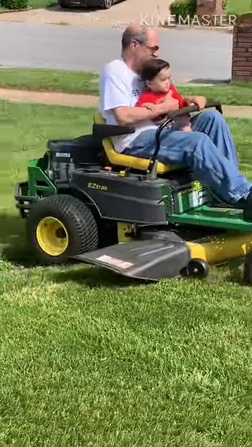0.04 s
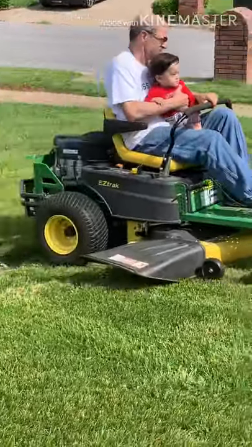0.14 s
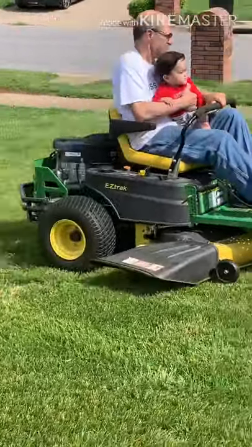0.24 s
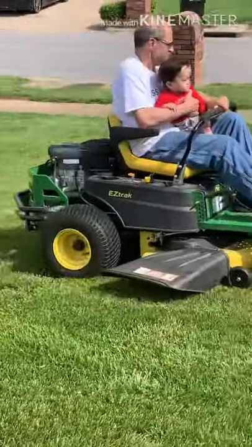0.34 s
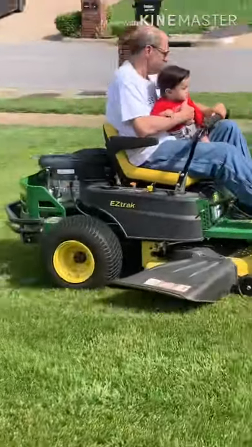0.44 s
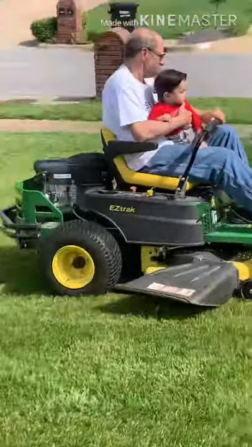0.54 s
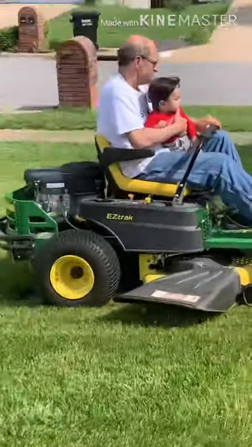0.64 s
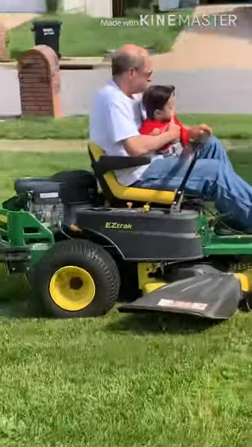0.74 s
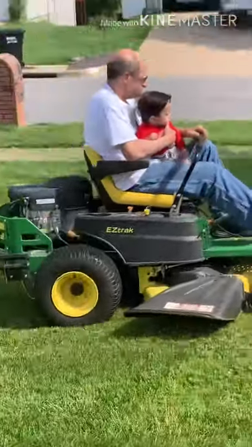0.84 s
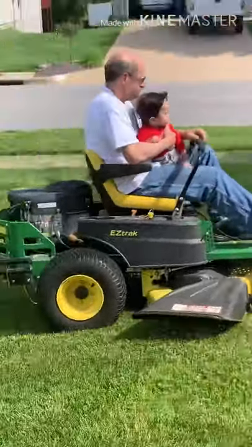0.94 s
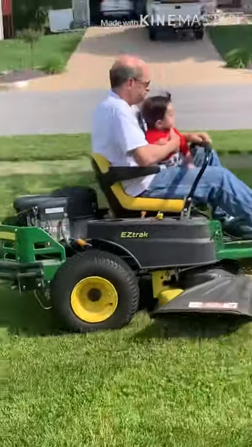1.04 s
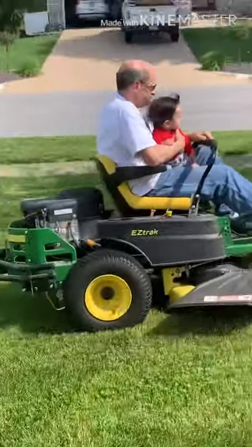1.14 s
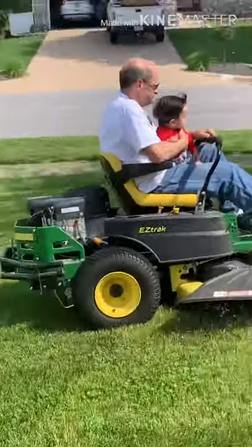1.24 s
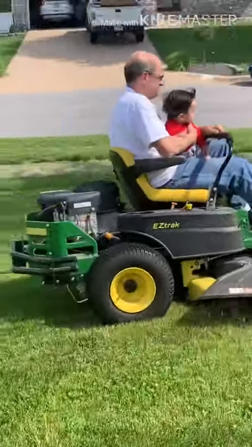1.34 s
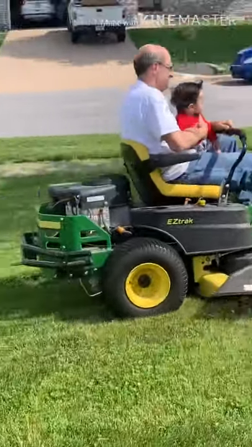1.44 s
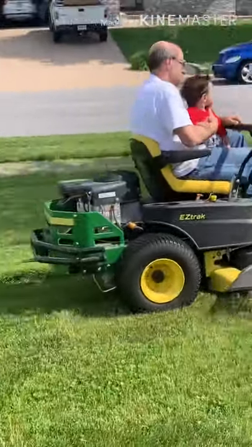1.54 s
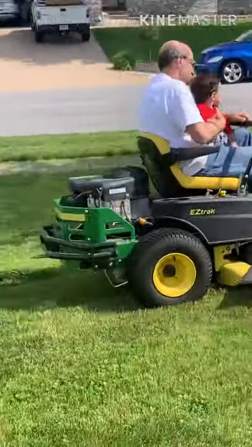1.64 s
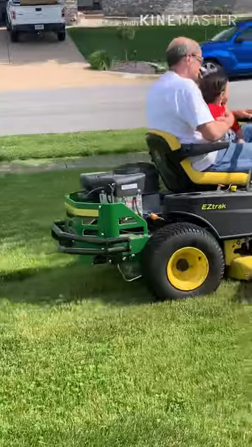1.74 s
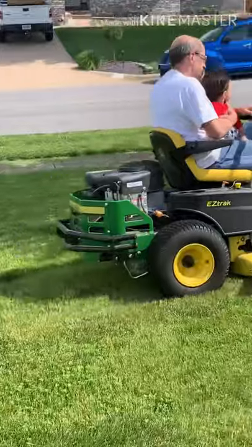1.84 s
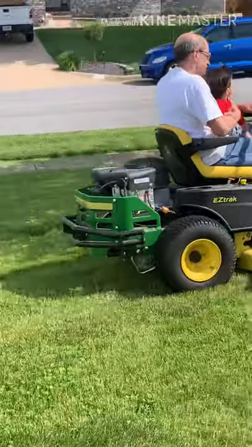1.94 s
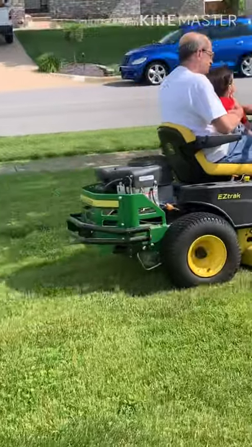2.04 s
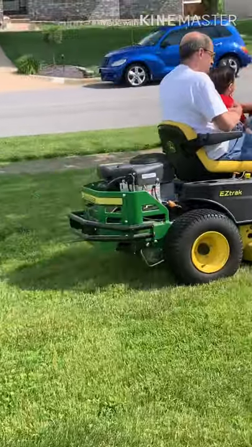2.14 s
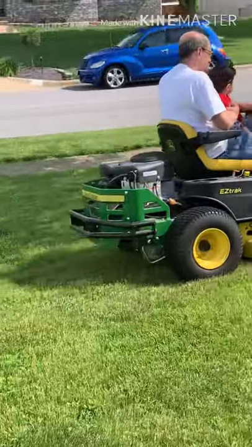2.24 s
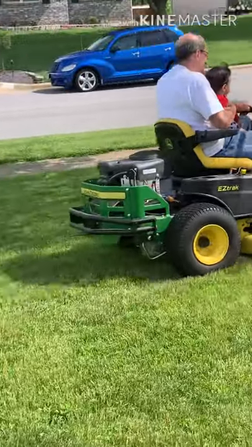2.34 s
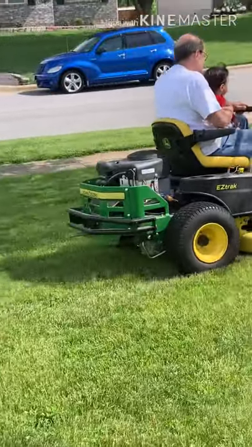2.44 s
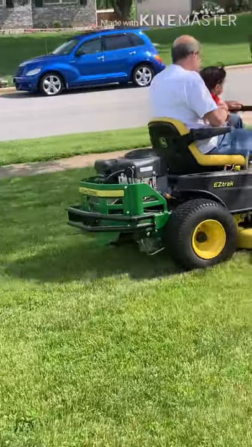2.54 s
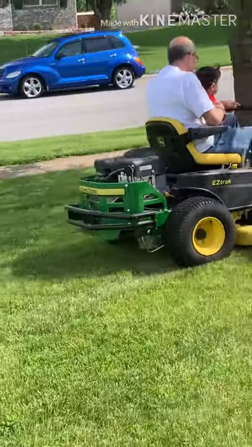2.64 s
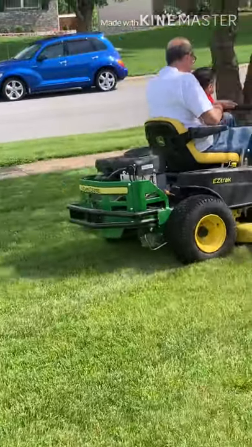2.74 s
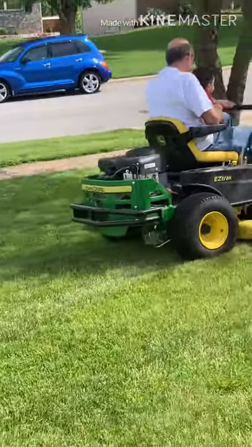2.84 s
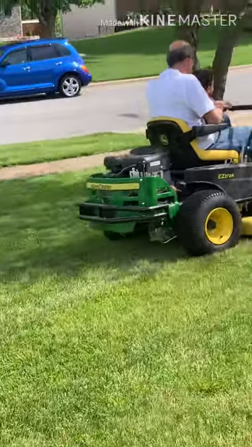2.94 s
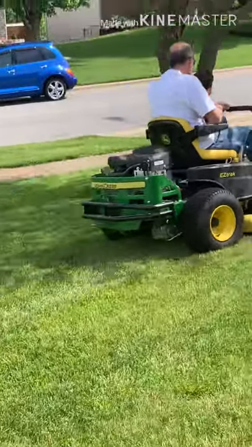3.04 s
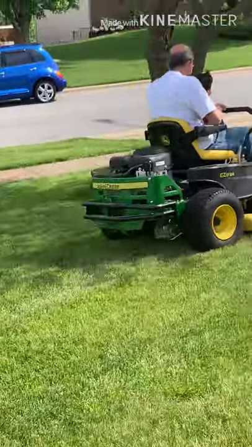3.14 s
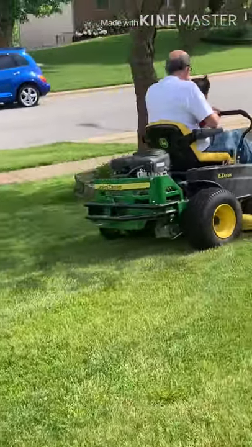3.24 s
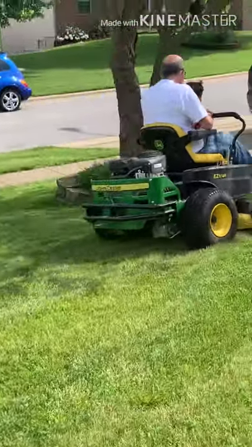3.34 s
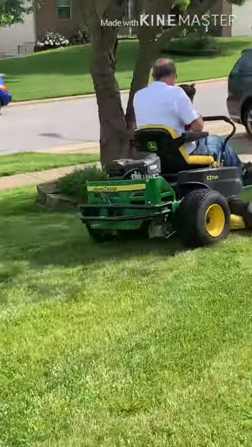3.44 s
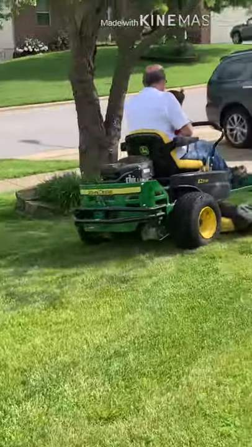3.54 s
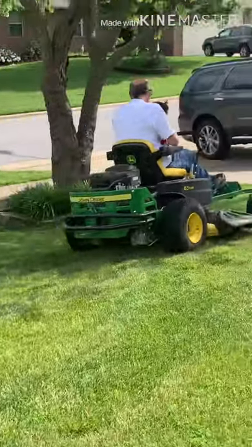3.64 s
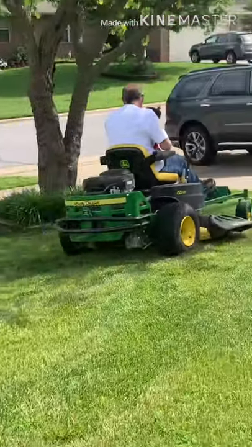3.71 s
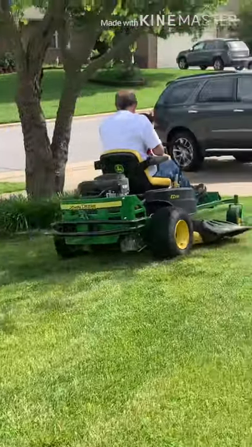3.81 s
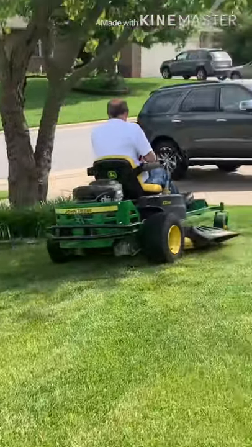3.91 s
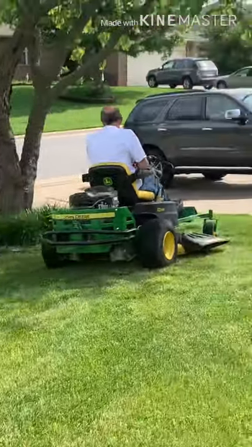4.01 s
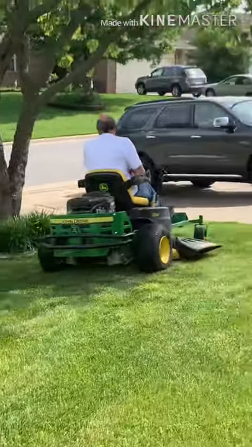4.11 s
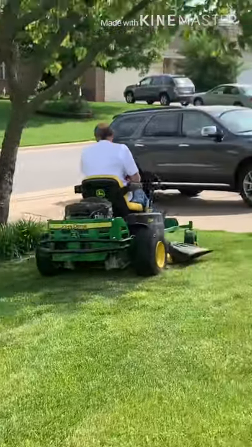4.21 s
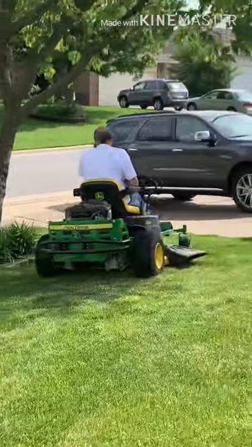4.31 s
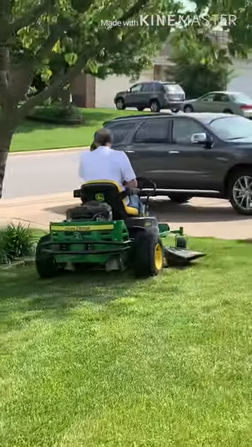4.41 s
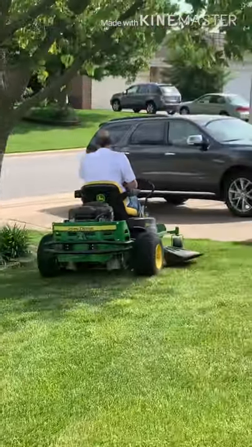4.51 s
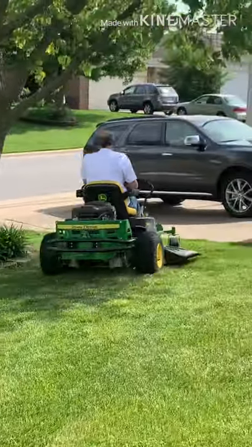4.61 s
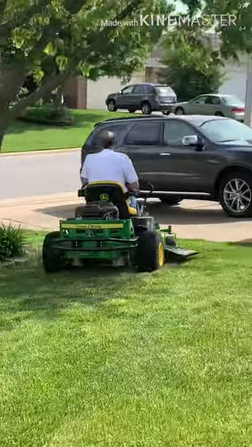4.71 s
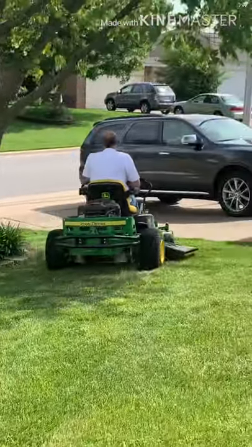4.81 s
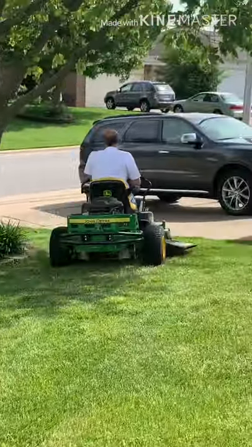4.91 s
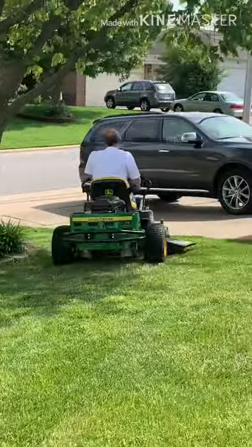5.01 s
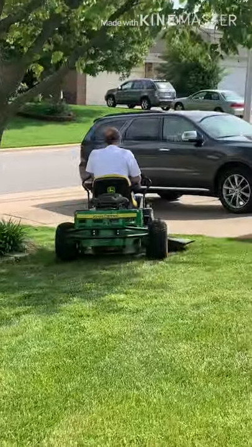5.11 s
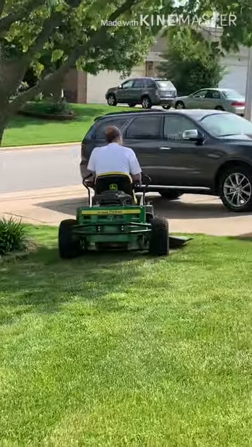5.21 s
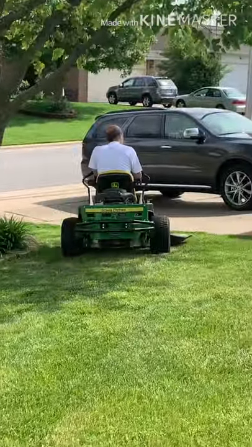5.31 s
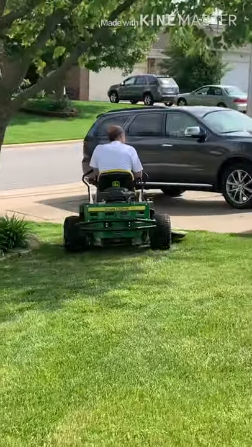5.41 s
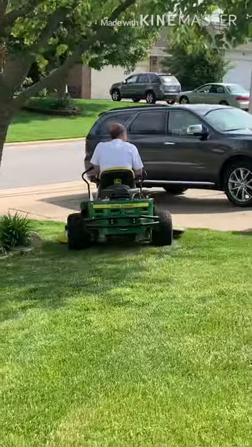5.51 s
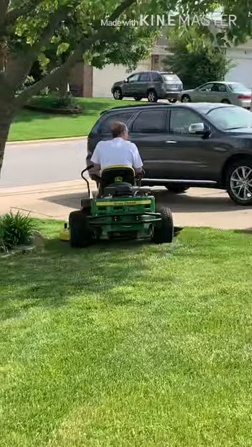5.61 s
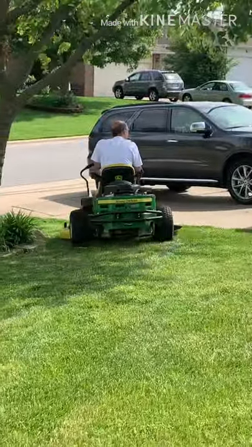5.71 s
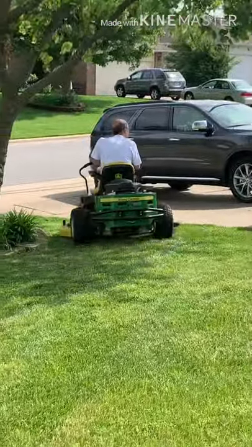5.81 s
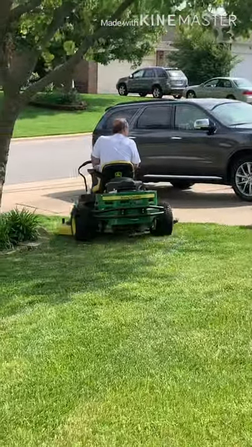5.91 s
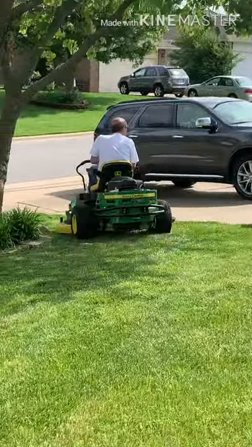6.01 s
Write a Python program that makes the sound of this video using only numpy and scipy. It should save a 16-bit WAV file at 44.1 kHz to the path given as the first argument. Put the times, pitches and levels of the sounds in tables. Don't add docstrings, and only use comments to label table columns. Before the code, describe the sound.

Steady twin-cylinder mower engine and chopping blade drone under rushing air and hiss, slowly receding, with faint belt squeals and soft low footstep thuds.

```python
import sys
import numpy as np
from scipy import signal
from scipy.fft import rfft, irfft
from scipy.io import wavfile
from scipy.ndimage import uniform_filter1d

SR = 44100
rng = np.random.default_rng(int(sys.argv[2]) if len(sys.argv) > 2 else 0)


def pcm_store(signal):
    levels = np.round(np.clip(np.atleast_2d(signal), -1, 1) * 32767)
    wavfile.write(sys.argv[1], SR, levels.astype(np.int16).T)


def voltage_ratio(decibels):
    exponent = np.asarray(decibels, float) / 20
    return 10 ** exponent


N = 267246
T = np.arange(N) / SR
F = np.fft.rfftfreq(N, 1 / SR)


def curves(table):
    time_s, *columns = np.transpose(table)
    return [np.interp(T, time_s, column) for column in columns]


def on_log(points):
    hz, value = np.transpose(points)
    return np.interp(np.log(F + 1), np.log(hz + 1), value)


def swells(table):
    return sum(height * np.exp(-((T - centre_s) / half_s) ** 2) for centre_s, half_s, height in table)


def walk(rate_hz):
    hold = int(SR / rate_hz)
    levels = np.repeat(rng.standard_normal(N // hold + 1), hold)
    return 1.33 * uniform_filter1d(uniform_filter1d(levels, hold), hold)[:N]


def tone(turns, rms_db):
    return np.sqrt(2) * voltage_ratio(rms_db) * np.cos(2 * np.pi * turns)


def rush(colour, ref_lo_hz, ref_hi_hz, flicker_db, rate_hz):
    lo_hz, hi_hz = colour[0][0], colour[-1][0]
    gain = voltage_ratio(on_log(colour))
    gain[(F < lo_hz) | (F > hi_hz)] = 0
    gain /= np.sqrt(2 * np.sum(gain[(F > ref_lo_hz) & (F < ref_hi_hz)] ** 2) / N)
    noise = rfft(rng.standard_normal(N)) * gain
    out = 0
    for step in np.arange(np.log2(lo_hz) * 2, np.log2(hi_hz) * 2 + 1):
        band = np.clip(1 - abs(2 * np.log2(F + 1) - step), 0, 1)
        out = out + irfft(noise * band, N) * voltage_ratio(flicker_db * walk(rate_hz))
    return out


# (time [s], engine cycle rate [Hz], near blade pass rate [Hz])
SHAFT_SPEED = [(0.0, 25.993, 120.74), (0.356, 26.024, 121.36), (0.713, 26.057, 121.62),
               (1.069, 25.917, 120.74), (1.426, 25.776, 119.82), (1.782, 26.151, 121.52),
               (2.139, 26.377, 122.43), (2.495, 26.329, 122.14), (2.852, 26.346, 122.5),
               (3.208, 26.302, 122.41), (3.565, 26.157, 121.94), (3.921, 26.155, 121.46),
               (4.278, 26.421, 122.76), (4.634, 26.681, 124.54), (4.991, 26.732, 124.61),
               (5.347, 26.657, 124.21), (5.704, 26.62, 124.33), (6.06, 26.616, 124.51)]
# (centre [s], half length [s], mean blade rate change [Hz])
GRASS_DRAG = [
    (1.15, .12, .4),
    (1.43, .15, -1.15),
    (2.35, .12, -.5),
    (3.75, .12, .45),
    (4.0, .09, -.65),
    (5.0, .2, .9),
]


def rotation():
    cycle_hz, near_hz = curves(SHAFT_SPEED)
    cycle = .100 + np.cumsum(cycle_hz) / SR
    near = .273 + np.cumsum(near_hz) / SR
    pulley_ratio = 4.661
    mean = pulley_ratio * cycle + np.cumsum(swells(GRASS_DRAG)) / SR
    return cycle, near, mean


# (time [s], deck roar [dB], left minus right [dB])
DISTANCE_CURVE = [(0, -27.5, 4.5), (.4, -28.5, 3.5), (.9, -29.5, 3), (1.3, -30, 4), (1.65, -29.5, 4),
                  (2, -31, 3.5), (2.25, -30.5, 5), (2.75, -31.5, 4), (3.1, -30.5, 3), (3.45, -31.5, 3.5),
                  (3.85, -32, 3), (4.05, -33.5, 2), (4.45, -33, 3.3), (4.85, -33, 2.5), (5.4, -33, 3.5),
                  (5.7, -33.5, 3.5), (6.06, -33, 3)]


def distance():
    roar_db, pan_db = curves(DISTANCE_CURVE)
    return roar_db, roar_db - roar_db.mean(), 0.79 * (pan_db - pan_db.mean())


EXHAUST_PHASE = {2: -.48, 5: 0., 6: .45, 8: .02}
# (order, start level [dB], fade [dB/s], share of tail pipe swing)
EXHAUST_STRONG = [(2, -29.5, -1.26, .15), (5, -28.5, 0.14, 1.05), (6, -35, -0.05, 0.12),
                  (8, -36, -0.32, 1.15), (3, -51, 2, 1.1)]
# (order, level over order 6 [dB])
EXHAUST_WEAK = [(4, -12), (7, -3), (9, -7), (10, -11), (11, -12), (12, -7), (13, -15)]
# (time [s], level [dB])
TAIL_PIPE = [(0, 4), (.7, 2), (1, -2.5), (1.7, 1), (2.36, 0), (3.03, 3), (3.4, -4.5), (3.7, 1), (4.04, -5),
             (4.38, 1), (4.7, -0.5), (5.05, -1), (5.4, 1), (6.06, 2)]


def engine(cycle):
    facing_db = curves(TAIL_PIPE)[0]
    levels_db = {round(k): db + fade * T + share * facing_db for k, db, fade, share in EXHAUST_STRONG}
    out = tone(3 * cycle, levels_db[3])
    for k, turns in EXHAUST_PHASE.items():
        out = out + tone(k * cycle + turns, levels_db[k] + walk(13))
    for k, db in EXHAUST_WEAK:
        waver = 0.27 * walk(2.005) + 0.012 * k * walk(15)
        out = out + tone(k * cycle + waver, levels_db[6] + db + 5.3 * walk(3.97))
    return out


# (time [s], second spindle lag [blade passes], third lag [blade passes],
# grass load [dB], sharpness [dB per tone])
BELT_SLIP = [(0.0, 0.33, 0.22, 2.5, -0.18), (0.46, 0.32, 0.365, 4.5, -0.56),
             (0.66, 0.262, 0.29, -1.0, 0.13), (1.18, 0.091, 0.51, 0.1, 1.49), (1.44, 0.086, 0.49, -2, 0.9),
             (1.65, 0.14, 0.57, -0.4, 0.94), (2.27, 0.3, 0.61, -7.5, 2.04), (2.48, 0.31, 0.78, -6.5, 3),
             (2.88, 0.28, 0.888, 1.3, -1.2), (3.27, 0.16, 0.9, 3.4, -0.5), (3.5, 0.24, 0.91, 3.0, -0.1),
             (3.9, 0.16, 0.97, -2.0, 0.8), (4.15, 0.19, 0.92, 0.3, -3), (4.61, 0.19, 0.94, 4.5, -1.8),
             (4.92, 0.28, 0.84, 2.5, -2.5), (5.24, 0.31, 1.03, -0.5, 0.57), (5.58, 0.41, 1.08, -0.5, -0.5),
             (6.06, 0.354, 1.039, -4.5, 0.94)]
# (near spindle start level [dB], fade [dB/s], second spindle share, third share)
SPINDLE_TONES = [(-21, -1.01, 0.43, -0.026), (-19, -1.64, 0.78, -0.045), (-21, -2.02, 0.43, 0.5),
                 (-33, -0.03, 0.3, 0.64), (-35.5, -1.82, 1.69, 0.14), (-38, -0.2, 0.045, 0.82),
                 (-31, -7, 0.054, 0.15), (-49.6, -4, 0.54, 1.4)]


def spindles():
    second, third, load_db, sharp_db = curves(BELT_SLIP)
    floor = voltage_ratio(-46.5)
    levels_db = []
    for k, (db, fade, share2, share3) in enumerate(SPINDLE_TONES, 1):
        second_wave = share2 * np.exp(2j * np.pi * k * second)
        third_wave = share3 * np.exp(2j * np.pi * k * third)
        tone_db = db + fade * T + load_db + 0.1 + (sharp_db + 0.45) * (k - 1)
        size = abs(1 + second_wave + third_wave) * voltage_ratio(tone_db)
        levels_db.append(20 * np.log10(np.hypot(size, floor)))
    return levels_db


def blades(near, mean, roar_db):
    levels_db = spindles()
    out = tone(near, levels_db[0] + .5 * walk(17))
    shake = .016 * walk(12)
    for k in range(2, 17):
        if k < 9:
            db = levels_db[k - 1]
        else:
            db = (roar_db + levels_db[6]) / 2 - 10.0 - 0.76 * (k - 8)
            db = db + np.clip(9.9 * walk(3.86), -15, 4)
        waver = .15 * walk(2) + .014 * k * walk(18)
        dip = near - .5 if k < 4 else mean
        out = out - tone(k * (dip + shake) + waver, db + 1.5 * walk(15))
    return out


# (frequency [Hz], density [dB/Hz])
ROAR_COLOUR = [(30, -6), (70, 3), (170, 8), (300, 10), (560, 7.5), (1000, 2.5), (1500, 1), (1900, -2),
               (2300, -9), (4000, -18.5)]


def deck_roar(chop, roar_db):
    noise = rush(ROAR_COLOUR, 1036, 2300, flicker_db=1.35, rate_hz=7)
    return noise * (1 + 0.18 * chop) * voltage_ratio(roar_db - 1.7)


def rattle(level_db, count=1500):
    out, t = np.zeros(N + 2048), np.arange(2048) / SR
    for when, pitch, size, ring in rng.random((count, 4)):
        i, hz = int(when * N), 900 * 11 ** pitch
        ring_s = .004 + .006 * ring
        db = level_db[i] - 4.5 * np.log2(hz / 3000) + np.clip(12.9 * size ** 2, 0, 12)
        envelope = (t / ring_s) * np.exp(1 - t / ring_s)
        out[i:i + 2048] += voltage_ratio(db) * envelope * np.sin(2 * np.pi * hz * t)
    return out[:N]


# (frequency [Hz], density [dB/Hz])
RASP_COLOUR = [(1500, -9), (2200, -1), (2700, 3), (3300, -2), (3800, 1.5), (4400, -7), (5400, -6),
               (7000, -8.5)]
# (centre [s], half length [s], rise [dB])
CHUTE_THROWS = [
    (0, .35, 5),
    (1.4, .7, 1.5),
    (5.6, 0.78, 1.5),
]


def clippings(chop, nearness_db, gust_db):
    rasp_db = -38.5 + 0.59 * nearness_db + swells(CHUTE_THROWS)
    noise = rush(RASP_COLOUR, 2130, 4430, flicker_db=2.5, rate_hz=6.14) * (1 + 0.084 * chop)
    return noise * voltage_ratio(rasp_db - 3.5 + gust_db) + rattle(rasp_db - 9.5)


# (frequency [Hz], density [dB/Hz])
HISS_COLOUR = [(3000, -18.5), (4500, 4.5), (5500, 0), (7000, 1), (9000, -1), (12000, -4), (14500, -5.5),
               (15800, -11)]


def fan_hiss(cycle, chop, nearness_db, gust_db):
    fade_db_s = -0.53
    hiss_db = -39.5 + 0.59 * nearness_db + fade_db_s * (T - T.mean())
    turn = 2 * np.pi * cycle
    firing = .06 * np.cos(turn) + .04 * np.cos(2 * turn) + .08 * np.cos(3 * turn)
    noise = rush(HISS_COLOUR, 6000, 8500, flicker_db=1.3, rate_hz=7)
    return noise * (1 + firing + .07 * chop) * voltage_ratio(hiss_db - 2.0 + gust_db)


# (centre [s], half length [s], rise over rest [dB])
BELT_SQUEALS = [
    (.4, .8, 8),
    (1.5, 0.42, 15),
    (2.2, .5, 8),
    (3.55, .45, 16),
]


def belt():
    rest_db = -66
    squeal_hz = 8890 + 45 * walk(40)
    return tone(np.cumsum(squeal_hz) / SR, rest_db + swells(BELT_SQUEALS) + 3.3 * walk(24.7))


# (centre [s], half length [s], scatter rise [dB])
SCATTER_RISES = [
    (.1, 0.77, 2.5),
    (2.85, 0.74, 5),
    (5.7, 1, 4),
]


def scatter(mower):
    detours = np.array([np.roll(mower, lag_samples) for lag_samples in (1630, 2270)])
    return detours * voltage_ratio(-4 + swells(SCATTER_RISES))


# (frequency [Hz], right trails left [rad])
PORT_LAG = [(0, 0), (200, -.08), (700, .76), (1400, -.1), (1800, .39), (2450, 2.57), (3000, 2.06),
            (3800, 1.59), (4900, 3.1), (6950, 6.28), (9650, 9.42), (12450, 12.57), (15000, 15.71),
            (17000, 16.5)]
# (frequency [Hz], left minus right [dB])
PORT_LEVEL = [(60, 0.5), (200, -4), (400, -0.5), (750, 4.5), (1100, -0.5), (2300, 0), (2700, 0.5),
              (3500, 4), (4400, 0.5), (15000, 0)]
# (frequency [Hz], level re direct [dB])
SCATTERED_SHARE = [(60, -28), (300, -15), (700, -7), (1400, -15), (2300, -3), (3300, -.5), (4900, -9),
                   (5800, -2.5), (8500, -3), (13300, -1), (14300, -9)]


def ports(direct, scattered):
    hz, radians = np.transpose(PORT_LAG)
    half = np.exp(.5j * np.interp(F, hz, radians)) * voltage_ratio(on_log(PORT_LEVEL) / 2)
    spread = rfft(scattered) * voltage_ratio(on_log(SCATTERED_SHARE))
    return irfft(rfft(direct) * np.array([half, 1 / half]) + spread, N)


# (time [s], peak level [dB], pitch [Hz])
FOOTFALLS = [
    (.53, -32, 75),
    (2.26, -22, 66),
    (2.75, -38, 87.4),
    (3.26, -25, 66),
    (3.74, -34, 85),
    (4.28, -24, 78),
    (4.74, -28, 67.3),
    (5.19, -22, 72),
    (5.70, -40, 66),
]


def steps():
    out = np.zeros(N)
    for time_s, db, hz in FOOTFALLS:
        t = np.clip(T - time_s, 0, None)
        envelope = (t / 0.049) * np.exp(1 - t / 0.046)
        out += voltage_ratio(db - 2.5) * envelope * np.sin(2 * np.pi * hz * t)
    return out


def scene():
    cycle, near, mean = rotation()
    roar_db, nearness_db, pan_db = distance()
    chop = np.cos(2 * np.pi * mean)
    gust_db = .6 * walk(14) + .6 * walk(6)
    mower = engine(cycle) + blades(near, mean, roar_db) + deck_roar(chop, roar_db)
    mower = mower + clippings(chop, nearness_db, gust_db) + fan_hiss(cycle, chop, nearness_db, gust_db)
    mower = mower + belt()
    heard = ports(mower, scatter(mower))
    return heard * voltage_ratio(np.array([pan_db, -pan_db]) / 2) + steps()


def without(x, bands_hz):
    return irfft(rfft(x) * np.prod([(F < lo) | (F > hi) for lo, hi in bands_hz], axis=0), N)


def gated(x, lo_hz, hi_hz, loss):
    return x - (x - without(x, [(lo_hz, hi_hz)])) * np.clip(loss, 0, 1)


def low_pass(x):
    return signal.sosfilt(signal.butter(12, 15750, fs=SR, output="sos"), x)


def record(dry):
    mix = dry / (1 + abs(dry / .95) ** 5) ** (1 / 5)
    return low_pass(mix)


dry = scene()
out = record(dry)
pcm_store(out)
```